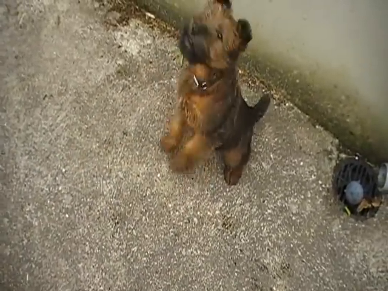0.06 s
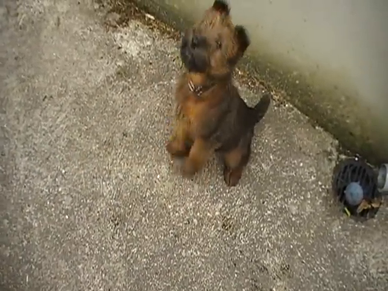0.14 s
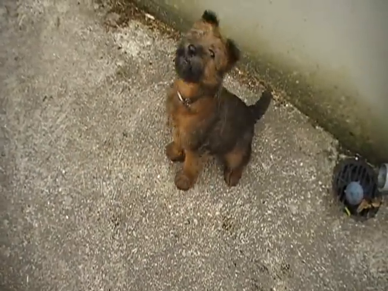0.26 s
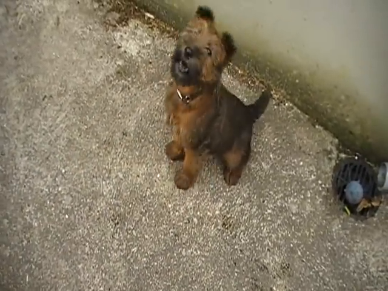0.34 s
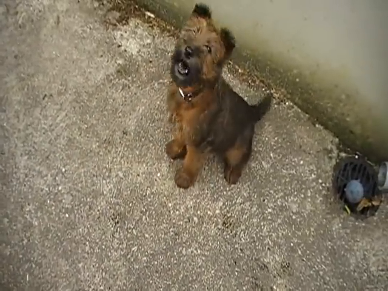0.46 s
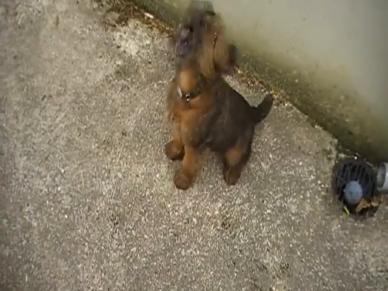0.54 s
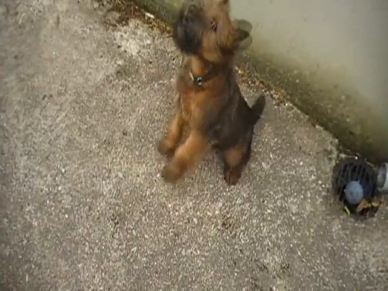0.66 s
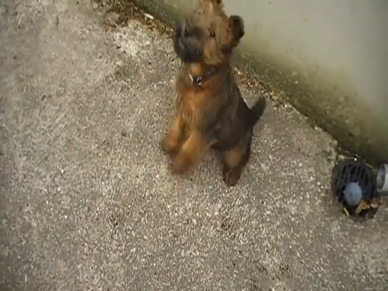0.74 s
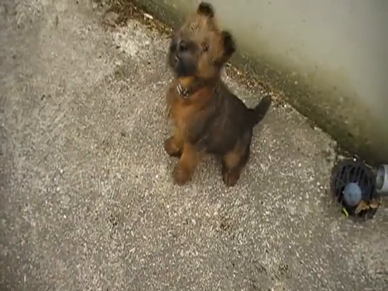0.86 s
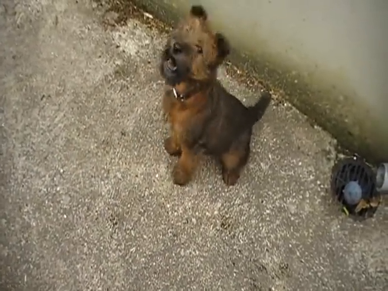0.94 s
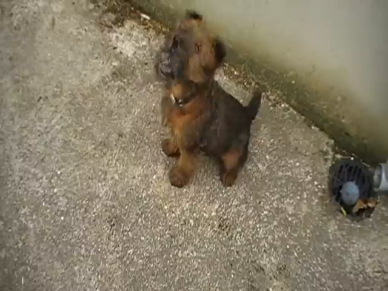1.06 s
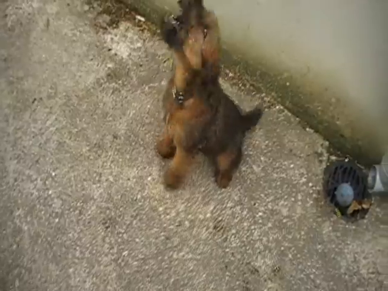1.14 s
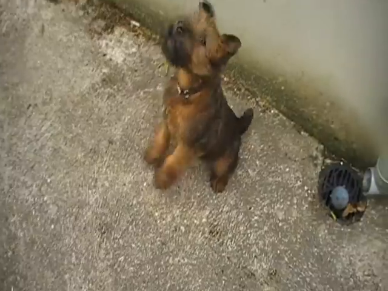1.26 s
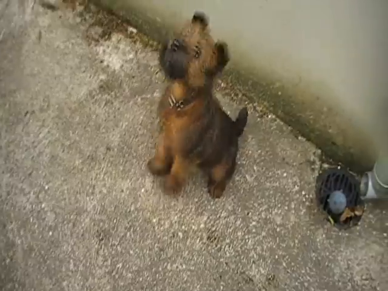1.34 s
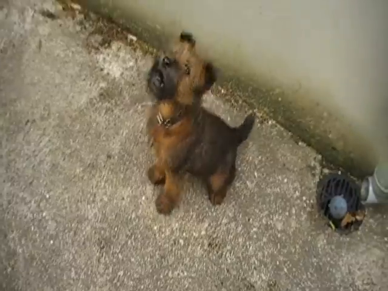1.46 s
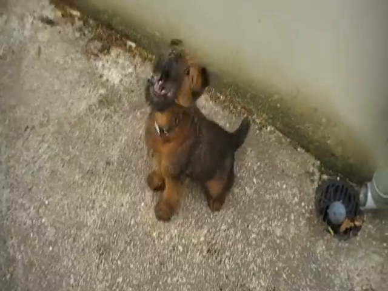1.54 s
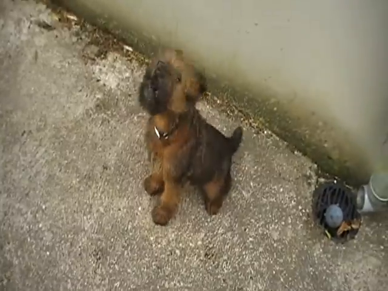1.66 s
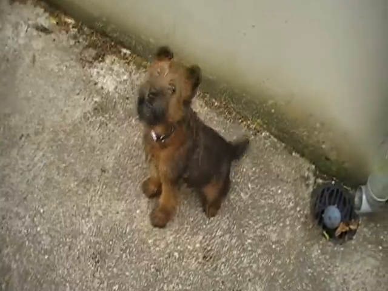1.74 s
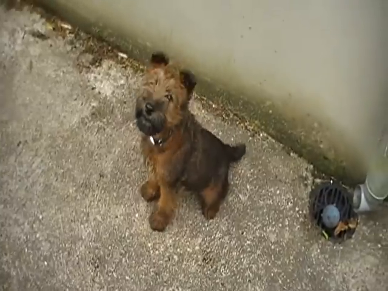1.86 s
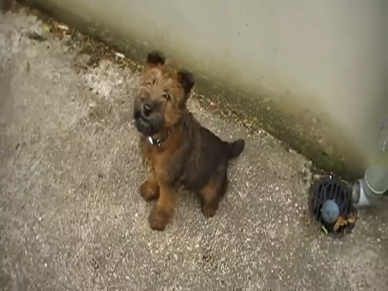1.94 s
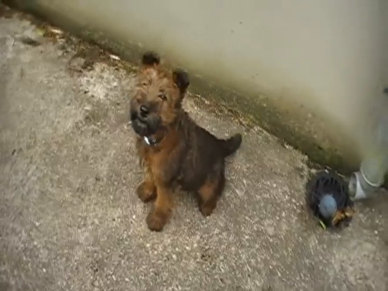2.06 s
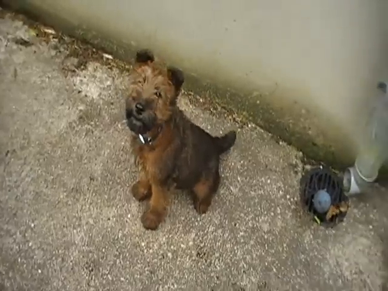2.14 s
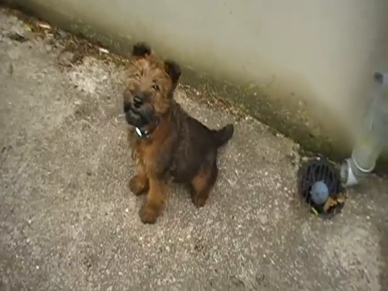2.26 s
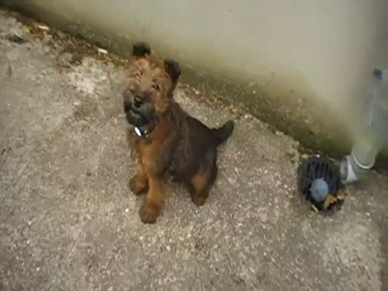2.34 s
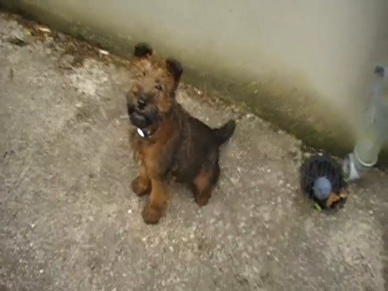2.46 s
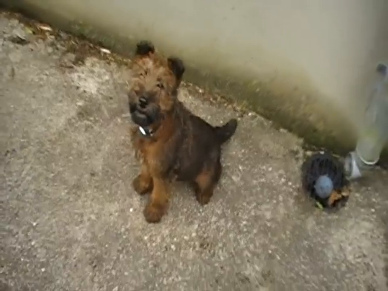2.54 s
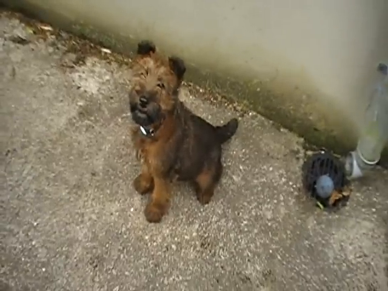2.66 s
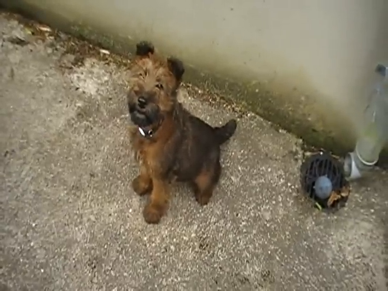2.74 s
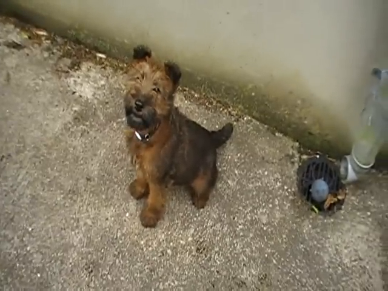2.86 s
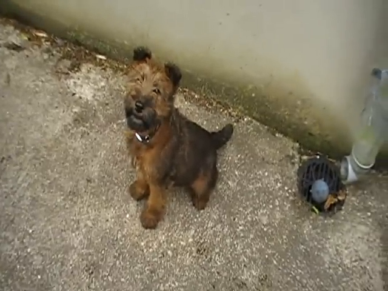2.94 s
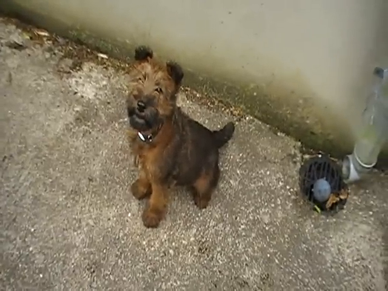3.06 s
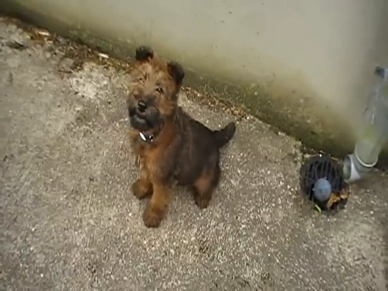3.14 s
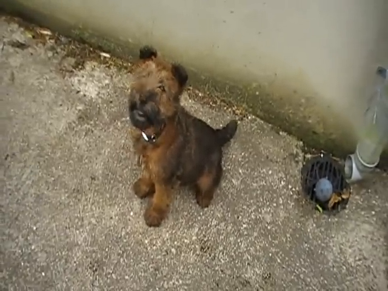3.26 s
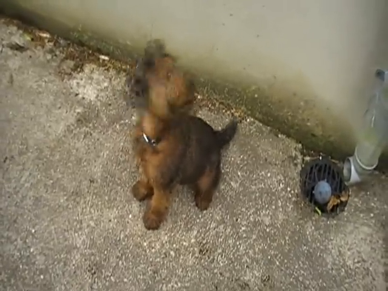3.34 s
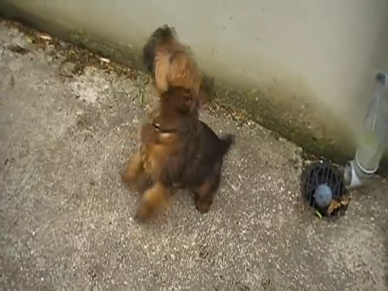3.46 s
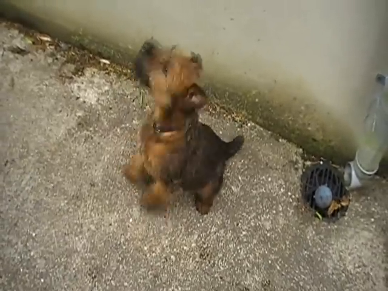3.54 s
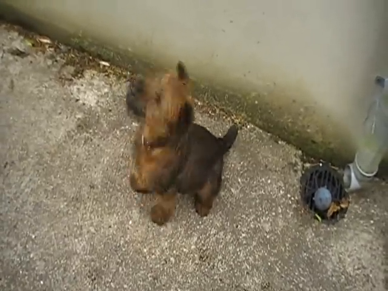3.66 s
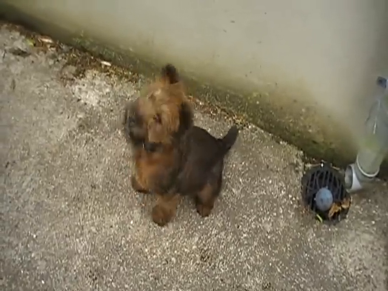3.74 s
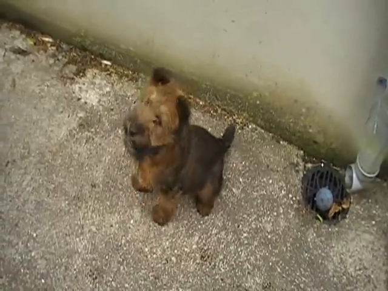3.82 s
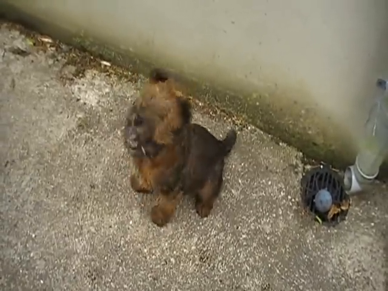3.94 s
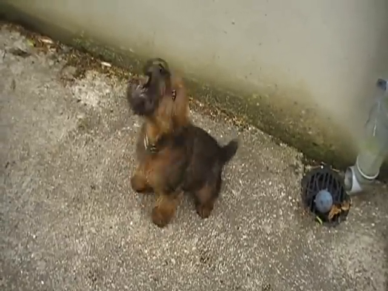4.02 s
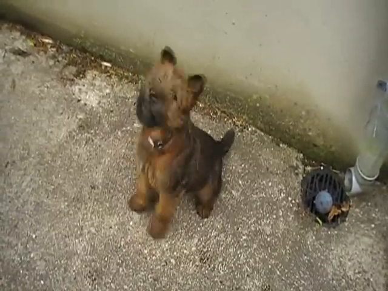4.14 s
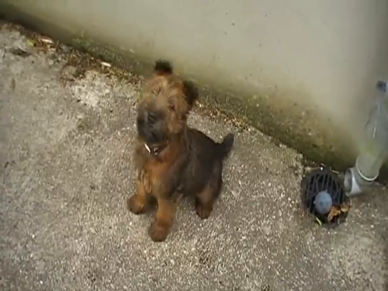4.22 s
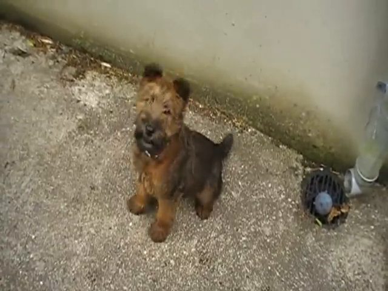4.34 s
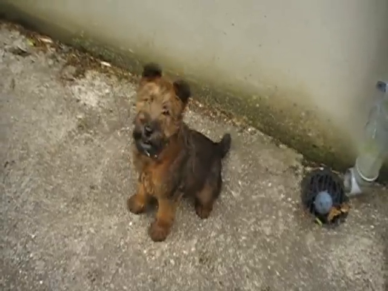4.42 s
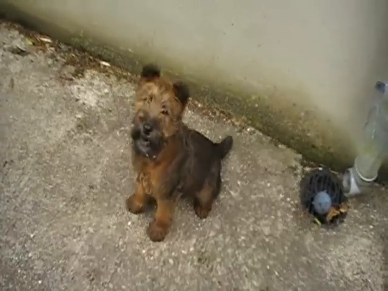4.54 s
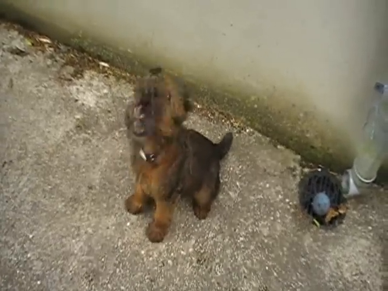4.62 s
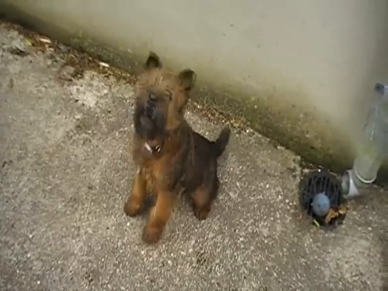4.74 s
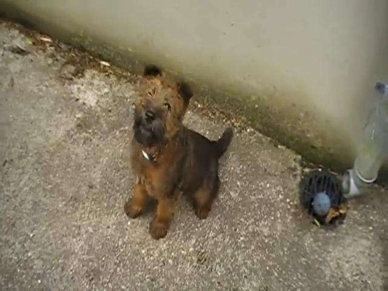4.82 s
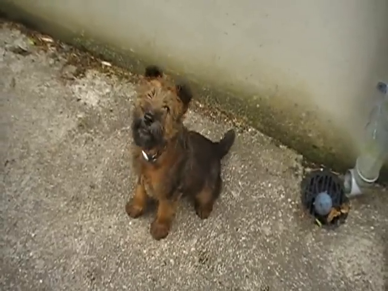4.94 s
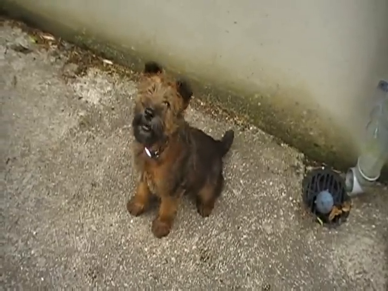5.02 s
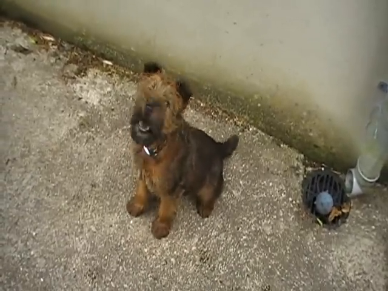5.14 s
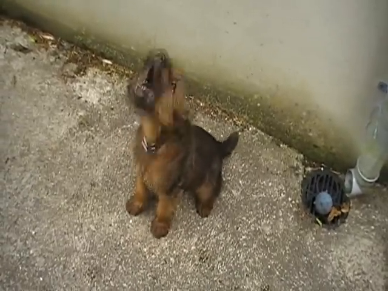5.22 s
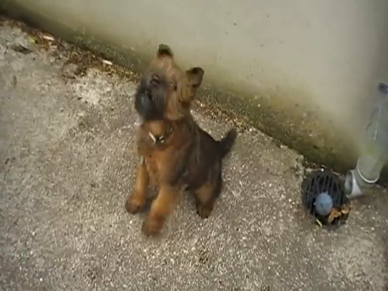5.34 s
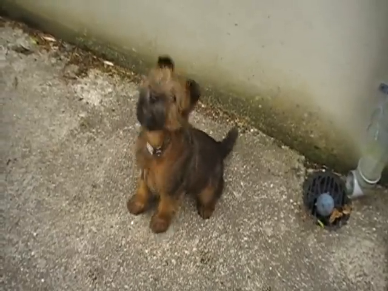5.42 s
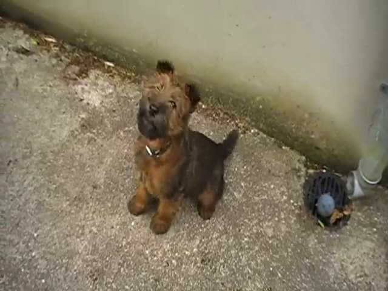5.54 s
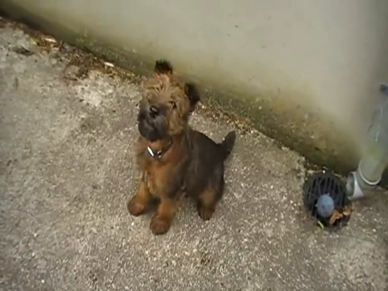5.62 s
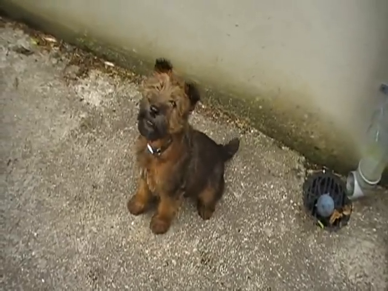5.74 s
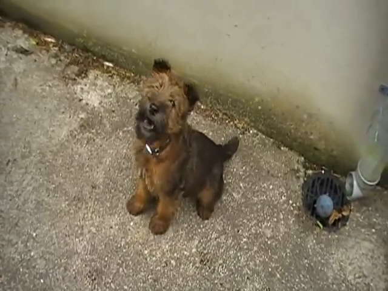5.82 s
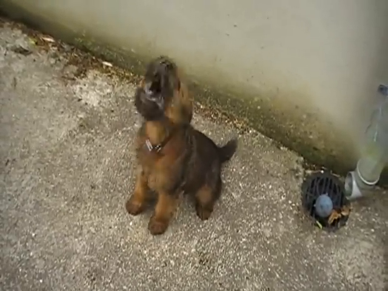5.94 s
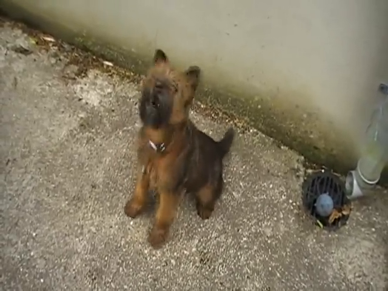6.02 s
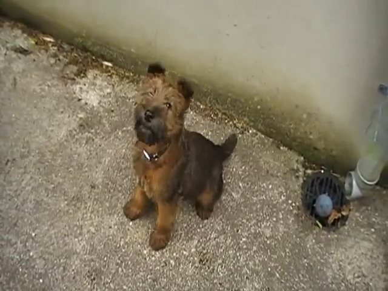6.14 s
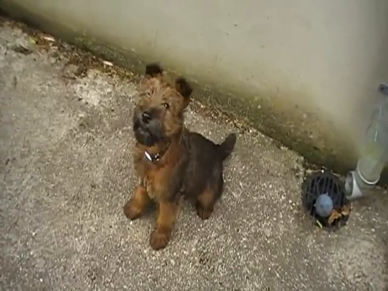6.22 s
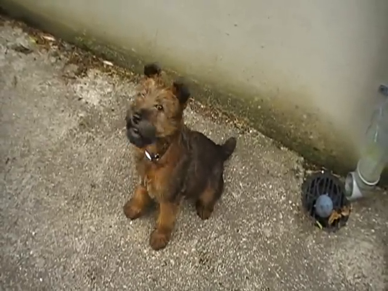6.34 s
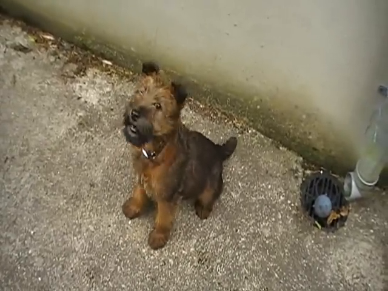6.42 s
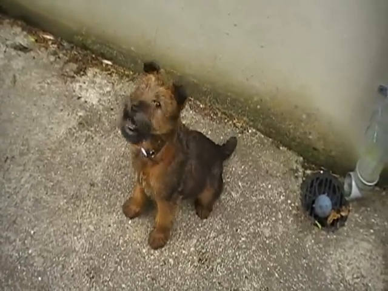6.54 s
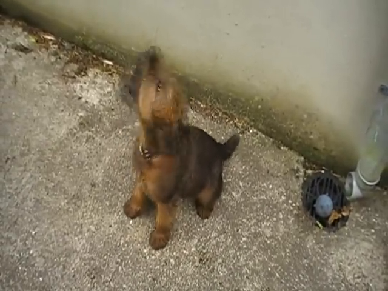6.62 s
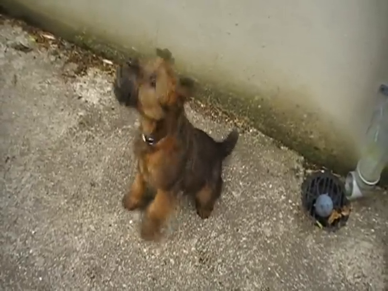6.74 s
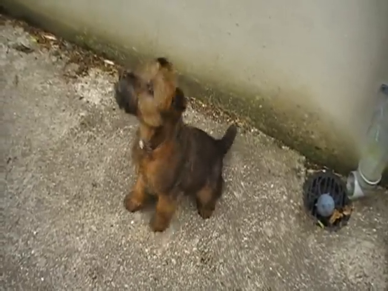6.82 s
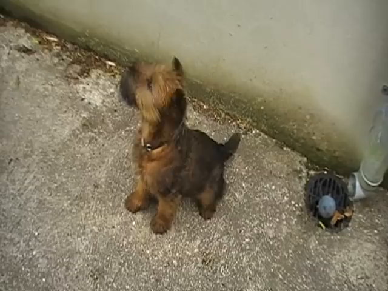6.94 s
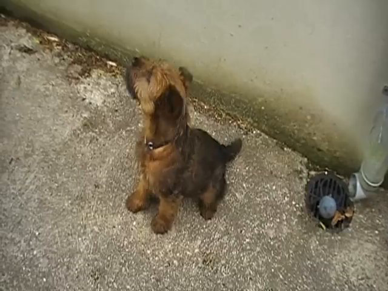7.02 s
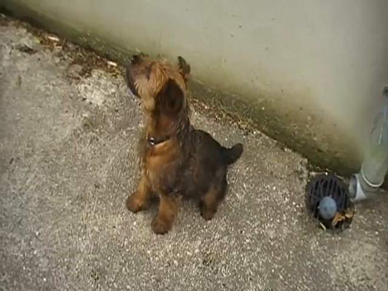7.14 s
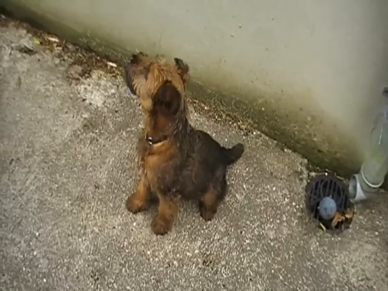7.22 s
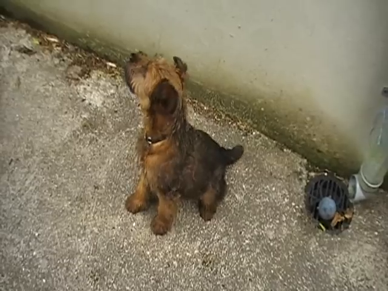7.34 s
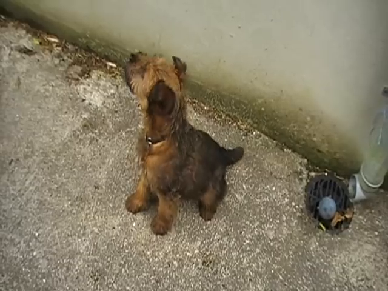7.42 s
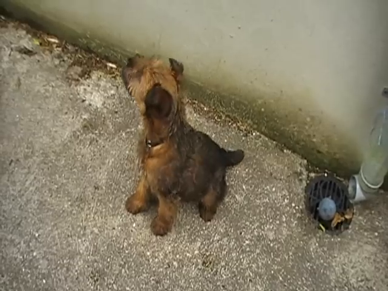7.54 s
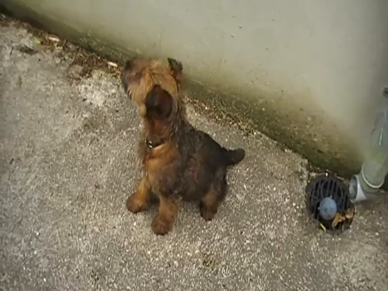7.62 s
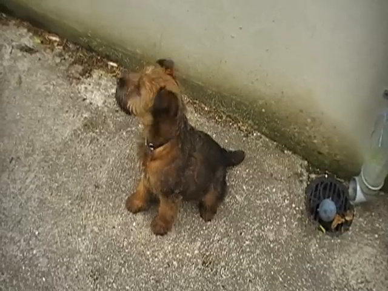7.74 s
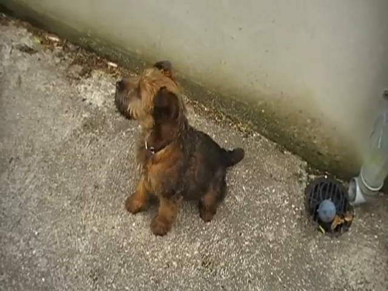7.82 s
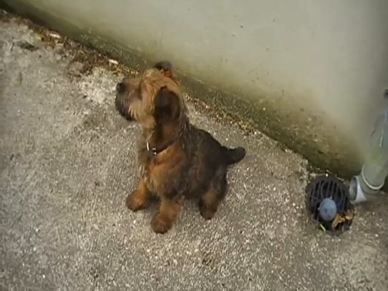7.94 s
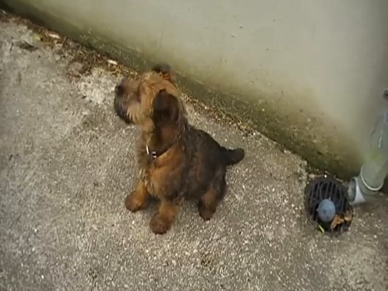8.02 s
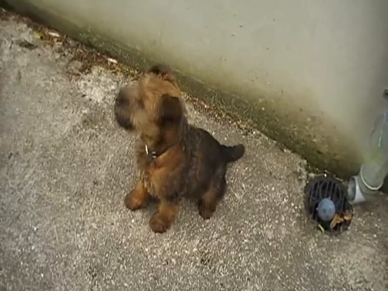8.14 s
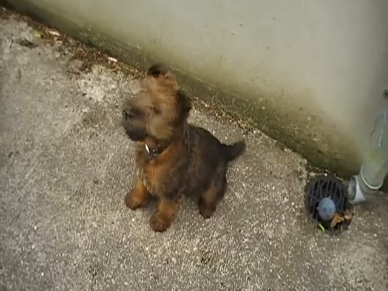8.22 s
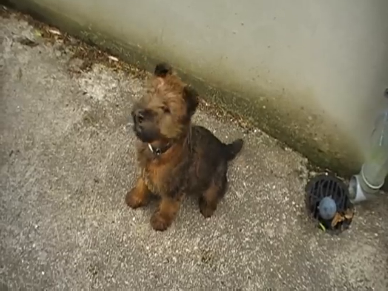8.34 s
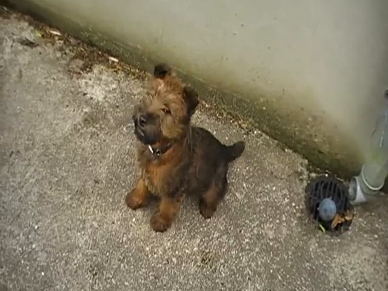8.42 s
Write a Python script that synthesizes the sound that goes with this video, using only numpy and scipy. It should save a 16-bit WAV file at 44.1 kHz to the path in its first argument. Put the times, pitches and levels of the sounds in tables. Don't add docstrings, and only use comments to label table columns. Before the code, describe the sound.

A puppy yaps close to a small stereo microphone in a concrete yard, over steady distant town hiss. A high, falling yap opens at 0 s; another at 0.6 s has a mouth click and a low tail. After a gasp, a longer yelp from 1.2 to 1.9 s drops, wavers, cracks and howls up and down. Until 3.4 s there is mostly hiss, with low wind buffets and a soft bump at 2.5 s. The highest, most broken yap comes at 3.5 s, followed by a bright puff. More shrill, raspy yaps land at 4.1, 4.7, 5.3, 6.0 and 6.7 s, several preceded by quick gasps, the loudest at 5.2 s. Short echoes and faint pipe ringing trail each call; loud peaks sound squeezed and slightly clipped. A hard low bump and gust hit at 7 s, then quiet, a tiny click at 8.2 s, a thin nose whistle and an airy puff.

```python
import sys
import numpy as np
from scipy import signal
from scipy.fft import rfft, irfft, next_fast_len
from scipy.io import wavfile
from scipy.ndimage import uniform_filter1d

SR = 44100
rng = np.random.default_rng(int(sys.argv[2]) if len(sys.argv) > 2 else 0)


def amplitude_ratio(level_db):
    exponent = np.asarray(level_db, float) / 20
    return 10 ** exponent


def unload_audio(sound):
    columns = np.transpose(np.atleast_2d(sound))
    steps = np.round(np.clip(columns, -1, 1) * 32767)
    wavfile.write(sys.argv[1], SR, steps.astype(np.int16))


N = 373527

# time in seconds, effort in dB, pitch in Hz.
EARLY_YAPS = [
    [(0.0, -4.5, 1303), (0.03, -15, 1167), (0.06, -9.5, 952), (0.1, -15.5, 872), (0.13, -24.5, 704),
     (0.19, -31, 596)],
    [(0.612, -2.5, 1113), (0.65, -11, 1252), (0.7, -19.5, 1154), (0.72, -6.5, 959), (0.75, -16, 876),
     (0.77, -22.5, 688), (0.84, -21.5, 589), (0.86, -38, 440), (0.9, -28, 341.6)],
    [(3.46, -6, 1510), (3.49, -7, 1594), (3.5, -11.5, 1313), (3.53, -14.5, 1242), (3.566, -9.5, 991),
     (3.58, -18.5, 890), (3.62, -26, 817), (3.7, -32.5, 776)],
    [(4.056, -3.5, 1235), (4.09, -9, 1150), (4.11, -16.5, 1256), (4.14, -19.5, 1026), (4.165, -7, 1001),
     (4.19, -21, 726), (4.235, -19, 576), (4.26, -27, 530), (4.32, -36, 496)],
]
# time in seconds, effort in dB, pitch in Hz.
LATE_YAPS = [
    [(4.679, -15, 804), (4.698, -6.5, 894.6), (4.732, -10, 1321), (4.76, -17, 1199), (4.797, -11, 1112),
     (4.815, -9, 964), (4.855, -21, 932), (4.875, -19.5, 584), (4.95, -20, 529)],
    [(5.281, -6, 964), (5.31, -9, 1220), (5.34, -18.5, 1148), (5.36, -19.5, 877.5), (5.39, -6.5, 948),
     (5.428, -22, 700), (5.52, -18.5, 618), (5.572, -16.5, 530), (5.6, -47.5, 542)],
    [(5.968, -11, 896), (5.982, -8, 901.4), (6.003, -13, 1200), (6.075, -10, 1130), (6.09, -11.5, 932.5),
     (6.148, -16.5, 896.7), (6.158, -15.5, 570), (6.183, -28.5, 349), (6.24, -32, 323)],
    [(6.685, -8.5, 831), (6.705, -10, 907), (6.717, -11.5, 1148), (6.745, -8.5, 1335), (6.762, -18.5, 1250),
     (6.79, -19.5, 1079), (6.81, -11, 971), (6.85, -21.5, 805), (6.92, -42, 793)],
]
# time in seconds, effort in dB, pitch in Hz.
YELP_YAP = [(1.169, -7, 1054), (1.19, -4.5, 1111), (1.22, -13.5, 1152), (1.26, -19, 955),
            (1.291, -9, 941.5), (1.312, -16, 784), (1.34, -18.5, 678), (1.438, -19.5, 667),
            (1.461, -14.5, 666)]
# time in seconds, effort in dB, pitch in Hz.
YELP_HOWL = [(1.554, -11.5, 655), (1.6, -14, 756), (1.62, -6, 906), (1.653, -9, 1033), (1.691, -13.5, 914),
             (1.734, -9, 950), (1.77, -15.5, 712), (1.822, -15, 555), (1.867, -45, 425)]
# opening rasp in dB, half-line share at the top (0-1), half-line share
# in the fall (0-1), roughness factor, extra brightness in dB per octave.
MANNER = [
    (-32, 0.3, 0.13, 1.2, -1),
    (-17, 0.24, 0, 1.05, -.5),
    (-23, .45, .75, 1.4, -.3),
    (-21, 0.24, .03, 1.1, -0.2),
    (-10.5, .25, .25, 1.0, .1),
    (-18.5, 0.36, 0.03, .85, 0.2),
    (-11, 0.28, 0.48, 1.05, 0.3),
    (-11, .35, 0.5, 1.0, -1),
    (-21, .15, .03, 1.35, -1.5),
]
# pitch in Hz, roughness (0-1), brightness in dB per octave,
# mouth opening as a factor.
REGISTER = [(340, 0.1, 6, 0.58), (480, 0.3, -4, 0.54), (570, .15, -2.5, 1.024), (677, .14, 2, 1.07),
            (850, .3, -1, 1.084), (959, .22, -4.5, 0.89), (1170, .44, -6, .98), (1550, .2, -3, 1.51)]
# frequency in Hz, level in dB.
THROAT = [(250, -21), (400, -11.5), (611, -5.5), (994, 4), (1450, -3.5), (1930, -2.5), (2940, -25),
          (3930, -23), (4900, -46.5), (6200, -47), (7200, -31), (10400, -30.5), (12200, -44), (14400, -61)]
# frequency in Hz, level in dB per Hz.
RASP = [(800, -22), (2500, 6), (5800, -5), (7500, -21), (11000, -33), (15000, -41)]
# peak time in seconds, rise in seconds, fall in seconds, peak in dB,
# brightness in dB per octave.
BREATHS = [
    (0.44, .11, .15, -42.5, 1),
    (1.085, .14, 0.071, -33.5, 3),
    (3.4, .06, .045, -42.5, -1),
    (3.7, 0.068, .1, -39.5, 8),
    (3.96, .12, 0.088, -35.5, 0),
    (5.215, 0.14, 0.044, -32, 3),
    (5.895, .12, .035, -38, 1),
    (6.6, 0.076, 0.056, -42.5, 0),
    (8.355, 0.097, 0.21, -37, 9.5),
]
# frequency in Hz, level in dB per Hz.
AIRWAY = [(350, -36), (600, -4), (694, -33), (1330, 1), (1880, -13.5), (4520, -11.5), (7390, -26.5),
          (10400, -30.5), (14400, -58)]
# time in seconds, pitch in Hz, level in dB, octave in dB.
WHISTLE = [(8.25, 6150, -44, -70), (8.262, 5950, -23.5, -39), (8.28, 5970, -25, -39),
           (8.294, 5900, -38, -40), (8.312, 5120, -29, -48), (8.32, 5090, -34, -62), (8.33, 5180, -28, -58),
           (8.352, 5250, -48, -68)]
# time in seconds, peak in dB, centre in Hz.
CLICKS = [
    (0.606, -10, 6600),
    (5.2744, -15.5, 6900),
    (8.2066, -22, 7040),
]
# frequency in Hz, level in dB, seconds to fall 60 dB.
PIPE = [(517, -9, .26), (684, -8, .4), (846, -6, .4), (1023, -14, .25), (1362, -16, .2), (1696, -18, .15)]
# frequency in Hz, seconds to fall 60 dB.
YARD = [(400, 0.19), (1060, 0.25), (2790, 0.21)]
# delay in seconds, left level in dB, right level in dB.
ECHOES = [
    (.0021, -11.5, -17.5),
    (.0047, -15, -11),
]
# frequency in Hz, level in dB per Hz.
GUST = [(12, -39), (20, -21), (85, 1.5), (499, -31), (600, -26), (780, -61), (1320, -120)]
# frequency in Hz, likeness (-1 is opposite).
OPPOSED = [(20, -.97), (150, -.95), (400, -.6)]
# peak time in seconds, peak in dB, seconds to fall 20 dB.
GUSTS = [(1.55, -28, 0.1), (1.9, -34, 0.4), (2.55, -34, .22), (3.1, -49.5, .4), (4.65, -55.5, 0.35),
         (5.4, -51.5, 0.1), (5.95, -55, 0.2), (6.97, -34, 0.3), (7.3, -49, 0.2), (8.05, -40, 0.39),
         (8.4, -47.5, 0.3)]
# time in seconds, peak in dB, pitch in Hz, seconds to fall 60 dB.
BUMPS = [
    (2.521, -37.5, 149, 0.16),
    (6.952, -14.5, 132.3, 0.047),
]
# frequency in Hz, level in dB per Hz.
TOWN = [(35, -34), (60, -18), (147, -9.5), (237, -3), (554, -10), (799, -10), (1050, -13), (1590, -13),
        (3550, -22), (5480, -23.5), (8280, -26.5), (11900, -36.5), (14400, -67)]
# frequency in Hz, likeness (1 is the same).
TOWN_LIKENESS = [(60, -0.35), (180, 0.52), (530, 1), (1570, 0.81), (4680, 0.85), (13900, 0.33)]
# frequency in Hz, left minus right in dB.
BALANCE = [(60, -4), (180, 2.5), (530, 5), (1570, 3.5), (4680, 1.5), (13900, 7)]


def evened(x):
    return x / np.sqrt(np.mean(x ** 2) + 1e-20)


def read(points, hz):
    f, value = np.transpose(points)
    return np.interp(np.log(hz + 1), np.log(f + 1), value)


def add(mix, s, sound):
    part = mix[round(s * SR):][:len(sound)]
    part += sound[:len(part)]


def unroll(rows):
    s, *columns = np.transpose(rows)
    t = np.arange(s[0], s[-1], 1 / SR)
    return [t] + [np.interp(t, s, c) for c in columns]


def wander(count, seconds):
    size = max(int(seconds * SR), 1)
    smooth = uniform_filter1d(rng.standard_normal(count), size)
    return evened(uniform_filter1d(smooth, size))


def coloured(x, db_of):
    hz, t, z = signal.stft(x, SR, nperseg=256)
    at = np.minimum(t * SR, len(x) - 1).astype(int)
    gain = amplitude_ratio(db_of(hz[:, None], at))
    gain = gain / np.sqrt(np.mean(gain ** 2, 0))
    return signal.istft(z * gain, SR, nperseg=256)[1][:len(x)]


def ring(hz, db, t60, count):
    t = np.arange(count) / SR
    return amplitude_ratio(db - 60 * t / t60) * np.sin(2 * np.pi * hz * t)


def leaping_pitch(t, rows):
    s, _, pitch = np.transpose(rows)
    points = np.arange(len(rows))
    place = np.interp(t, s, points)
    step = place % 1
    hz = np.interp(place - step + step ** 2 * (3 - 2 * step), points, pitch)
    trill_s = np.clip(t - 1.441, 0, .117)
    return hz * (1 - .095 * np.sin(np.pi * 25.6 * trill_s) ** 4)


def fold_tones(hz, turns, half, rough, tract):
    k = np.r_[np.arange(1, 24) / 2, np.arange(12, 30), np.arange(.75, 4, .5)][:, None]
    glide = abs(np.gradient(np.log(hz))) * SR
    at = slice(None, None, 32)
    f, h, r = hz[at], half[at], rough[at]
    quarter_share = 0.74 * h * np.clip(2.5 * r, 0, 1)
    share = np.where(k % .5, quarter_share, np.where(k % 1, h, 1))
    fade_db = 1.05 * np.maximum(glide[at] - 7.5, 0) * (k > 1.6)
    height = amplitude_ratio(tract(k * f, at) - fade_db) * share * (k * f < 15500)
    chest = amplitude_ratio(-6.5 + 23.0 * np.log2(700 / np.minimum(f, 700)))
    height[0] = np.maximum(height[0], chest * h)
    height[1] = np.maximum(height[1], chest)
    height[0] *= amplitude_ratio(-8)
    flicker = np.array([wander(len(f), .0002) for _ in k])
    height *= amplitude_ratio((3.5 + 8.6 * r) * flicker * np.clip(k - .45, .2, 1))
    height /= np.sqrt((height ** 2).sum(0) / 2)
    height = uniform_filter1d(height.repeat(32, 1)[:, :len(hz)], 48, axis=1)
    return (height * np.cos(2 * np.pi * k * turns + .3 * k ** 2)).sum(0)


def yap(rows, rasp_db, top_half, fall_half, rough_factor, extra_bright):
    t, effort_db, hz = unroll(rows)
    pitch, *laws = np.transpose(REGISTER)
    rough, bright, mouth = (np.interp(hz, pitch, law) for law in laws)
    age = t - t[0]
    clear = np.clip(2 - 2 * age / .04, 0, 1)
    steady = np.clip((age - .19) / .05, 0, 1)
    crack = np.exp(-((t - 1.546) / .016) ** 2)
    gape = clear * np.maximum(np.log2(1192 / hz), 0)

    broken = np.clip((hz - 994) / 153, 0, 1)
    fallen = np.clip((1036 - hz) / 125, 0, 1) * np.clip((hz - 600) / 125, 0, 1)
    half = top_half * broken * (1 - steady) + fall_half * fallen
    half = np.clip(half * (1 - clear) + .3 * crack, 0, 1)
    rough = rough * rough_factor * .3 ** clear * .4 ** steady
    rough = np.clip(rough + .32 * crack, 0, 1)
    bright = bright + extra_bright + 5 * gape + 1.5 * steady
    mouth = mouth * (1 + 1.06 * gape)

    def tract(f, at):
        shift = mouth[at] ** np.clip((5000 - f) / 2200, 0, 1)
        return read(THROAT, f / shift) + bright[at] * np.log2(np.clip(f, 300, 4200) / 1000)

    hz = leaping_pitch(t, rows)
    wobble = .003 * wander(len(t), .008) + .07 * rough ** 1.3 * wander(len(t), .0012)
    turns = np.cumsum(hz * (1 + wobble)) / SR
    folds = fold_tones(hz, turns, half, rough, tract)

    def above_pitch(f, at):
        return tract(f, at) - 30 * np.clip(np.log2(1.124 * hz[at] / (f + 1)), 0, 2)

    puffs = evened((0.1 + np.exp(-(turns % 1) / 0.1)) * rng.standard_normal(len(t)))
    voice = np.sqrt(1 - rough ** 2) * folds + 1.1 * rough * coloured(puffs, above_pitch)
    rasp = coloured(rng.standard_normal(len(t)), lambda f, at: read(RASP, f) + 0 * at)
    voice += rasp * amplitude_ratio(rasp_db - 60 * np.maximum(age - .02, 0) / 0.074)
    edge = np.clip(age / 0.0028, 0, 1) * np.clip((t[-1] - t) / 0.014, 0, 1)
    return t[0], amplitude_ratio(1.563 * effort_db + 16.0) * voice * edge


def breath(peak_s, rise_s, fall_s, peak_db, bright):
    t = np.arange(-rise_s, fall_s, 1 / SR)
    db = peak_db - 18 * np.maximum(-t / rise_s, t / fall_s) ** 1.7

    def shape(f, at):
        return read(AIRWAY, f) + bright * np.log2(np.maximum(f, 600) / 4000) + 0 * at

    air = coloured(rng.standard_normal(len(t)), shape)
    flutter_db = 0.96 * wander(len(t), .006)
    return peak_s - rise_s, amplitude_ratio(db + flutter_db) * air * signal.windows.tukey(len(t), .04)


def whistle(rows):
    t, hz, db, octave_db = unroll(rows)
    turn = 2 * np.pi * np.cumsum(hz * (1 + 0.0056 * wander(len(t), .001))) / SR
    tone = amplitude_ratio(db) * np.sin(turn) + amplitude_ratio(octave_db) * np.sin(2 * turn)
    return t[0], np.sqrt(2) * tone * signal.windows.tukey(len(t), .1)


def click(db, hz):
    return ring(hz, db, 0.0011, count=200) + ring(0.5 * hz, db - 15, 0.0059, count=200)


def puppy():
    out = np.zeros(N)
    calls = EARLY_YAPS + LATE_YAPS + [YELP_YAP + YELP_HOWL]
    for rows, manner in zip(calls, MANNER):
        add(out, *yap(rows, *manner))
    for row in BREATHS:
        add(out, *breath(*row))
    add(out, *whistle(WHISTLE))
    for s, db, hz in CLICKS:
        add(out, s, click(db, hz))
    return out


def yard(x):
    count = SR // 2
    taps = np.zeros((2, count))
    at = np.arange(700, count - 20, 20) + rng.integers(0, 20, (2, (count - 701) // 20))
    np.put_along_axis(taps, at, rng.choice([-1., 1.], at.shape), 1)
    taps[1] = 0.84 * taps[0] + 0.88 * taps[1]
    hz, t, z = signal.stft(taps, SR, nperseg=256)
    decay = amplitude_ratio(-60 * t / read(YARD, hz)[:, None])
    tail = signal.istft(z * decay, SR, nperseg=256)[1][:, :count]
    room = amplitude_ratio(-12) * tail / np.linalg.norm(tail[0])
    room += amplitude_ratio(-48.5) * sum(ring(f, db, t60, count=count) for f, db, t60 in PIPE)
    room[:, 0] += 1
    for s, *db in ECHOES:
        room[:, round(s * SR)] += amplitude_ratio(db)
    return amplitude_ratio(-1.0) * signal.fftconvolve(x[None], room, axes=1)[:, :N]


def field(points, likeness, patchy_db, size):
    frames, hz = 4 * N // size + 5, np.fft.rfftfreq(size, 1 / SR)
    a, b, c, d, patches = rng.standard_normal((frames, len(hz), 5)).T
    patches = evened(uniform_filter1d(uniform_filter1d(patches, 10, 0), 12, 1))
    same = np.clip(read(likeness, hz), -1, 1)[:, None]
    left, other = a + 1j * b, c + 1j * d
    z = np.array([left, same * left + np.sqrt(1 - same ** 2) * other])
    z *= amplitude_ratio(read(points, hz)[:, None] + patchy_db * patches)
    return evened(signal.istft(z, nperseg=size, noverlap=3 * size // 4)[1][:, :N])


def wind():
    t = np.arange(0, N, 64) / SR
    calm = amplitude_ratio(-78)
    blowing = calm + sum(amplitude_ratio(db - 20 * abs(t - s) / fall_s) for s, db, fall_s in GUSTS)
    level = np.interp(np.arange(N) / SR, t, blowing) * amplitude_ratio(12.0 + 4.0 * wander(N, 0.01))
    bumps = np.zeros(N)
    for s, db, hz, t60 in BUMPS:
        soft_start = np.minimum(np.arange(6000) / 400, 1)
        add(bumps, s, ring(hz, db + 18.5, t60, count=6000) * soft_start)
    return level * field(GUST, OPPOSED, patchy_db=-3.5, size=2048) + bumps * [[-.6], [1.4]]


def town():
    level_db = -38.5 - 2 * np.arange(N) / N
    return amplitude_ratio(level_db) * field(TOWN, TOWN_LIKENESS, patchy_db=.7, size=1024)


def scene():
    return yard(puppy()) + town() + wind()


def held(db, recovery_db):
    fall = np.arange(len(db)) * recovery_db / SR
    return np.maximum.accumulate(db + fall) - fall


def low_pass(x):
    return signal.sosfilt(signal.butter(12, 14500, fs=SR, output="sos"), x)


def record(dry):
    size = next_fast_len(N, True)
    hz = np.fft.rfftfreq(size, 1 / SR)
    balance = amplitude_ratio(read(BALANCE, hz) * [[.5], [-.5]])
    x = irfft(rfft(dry, size) * balance, size)[:, :N]
    power_db = 10 * np.log10(abs(uniform_filter1d((x ** 2).mean(0), 200)) + 1e-12)
    quick_db = 0.3 * np.maximum(held(power_db, recovery_db=297) + 37.5, 0)
    slow_db = held(np.clip(power_db + 28.5, 0, 4.0), recovery_db=6.5)
    x = x * amplitude_ratio(-uniform_filter1d(np.maximum(quick_db, slow_db), 100))
    thump = signal.lfilter([1, -1], [1, -.995], uniform_filter1d(x ** 4, 60))
    x = x + 0.22 * thump
    return low_pass(np.clip(x, -1, 1))


dry = scene()
out = record(dry)
unload_audio(out)
```